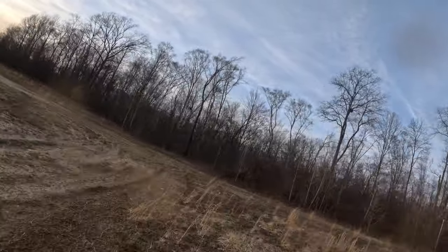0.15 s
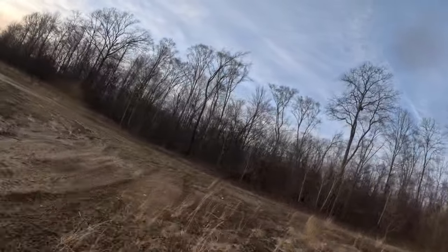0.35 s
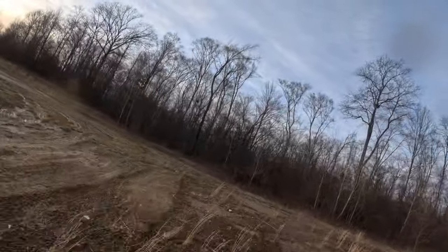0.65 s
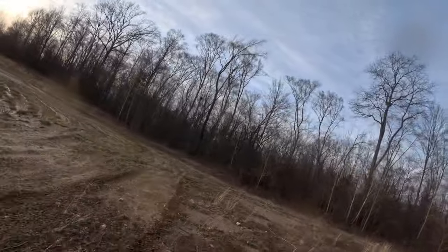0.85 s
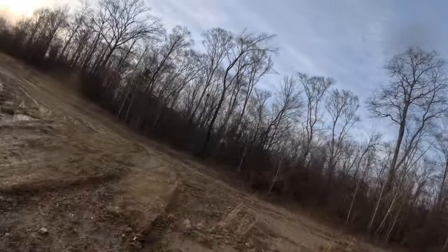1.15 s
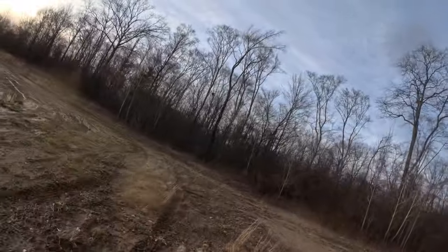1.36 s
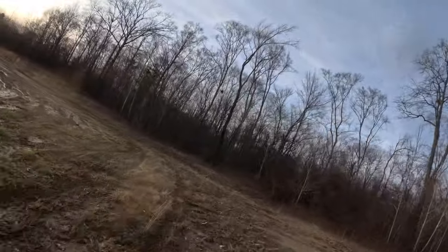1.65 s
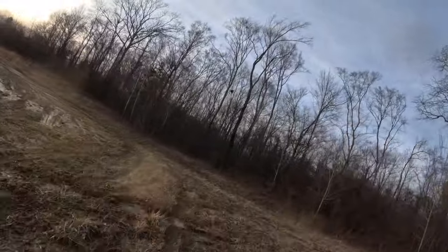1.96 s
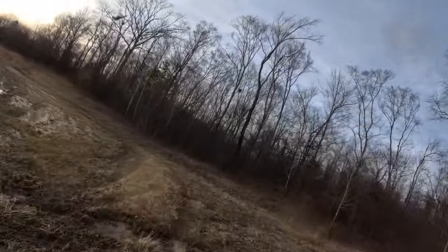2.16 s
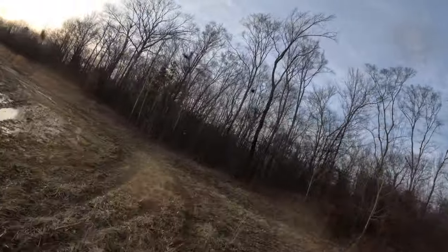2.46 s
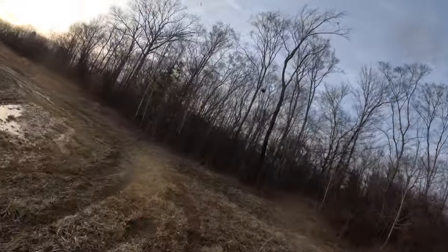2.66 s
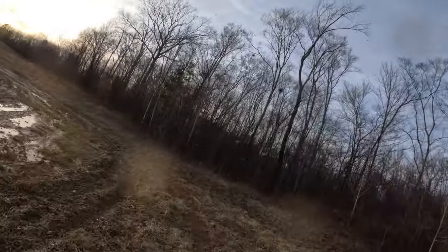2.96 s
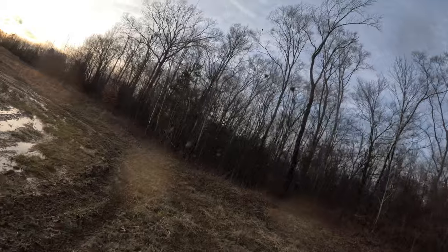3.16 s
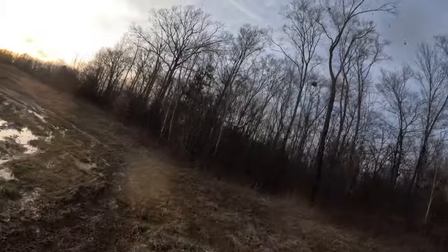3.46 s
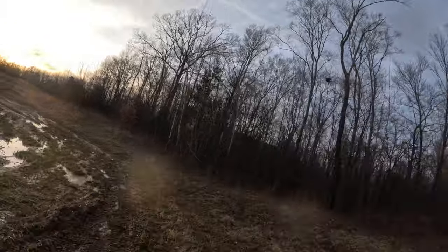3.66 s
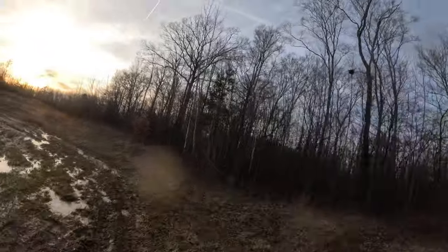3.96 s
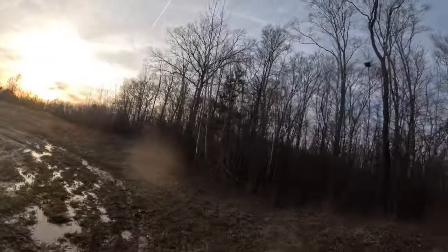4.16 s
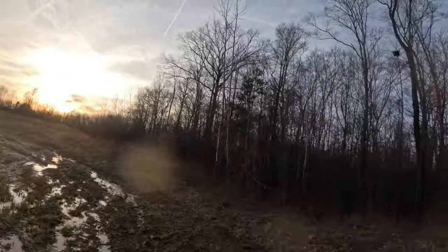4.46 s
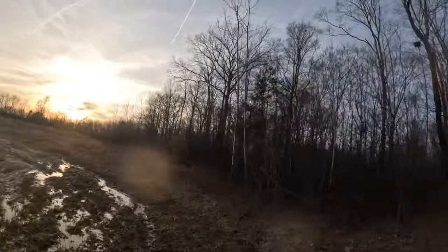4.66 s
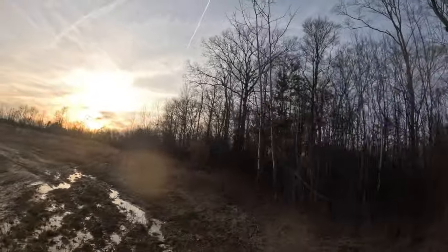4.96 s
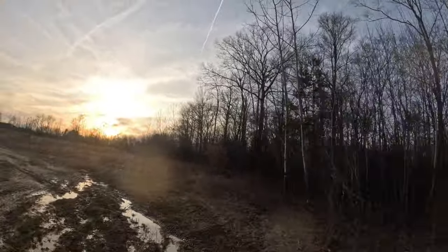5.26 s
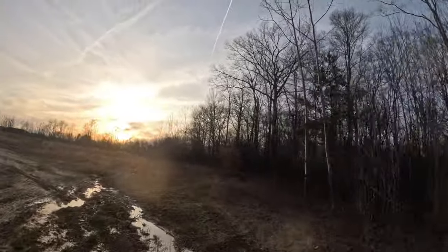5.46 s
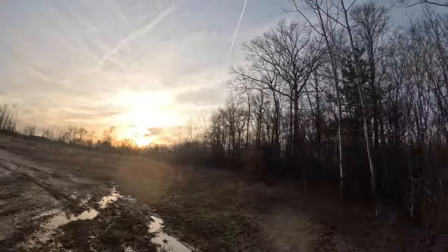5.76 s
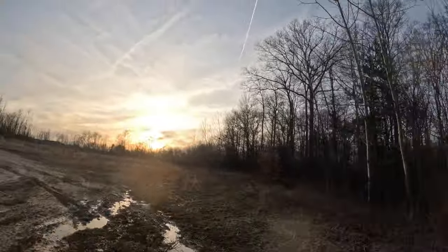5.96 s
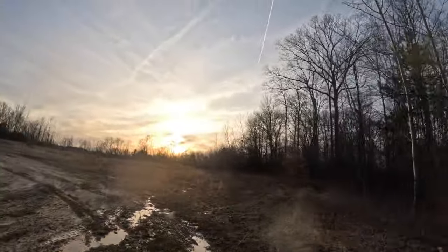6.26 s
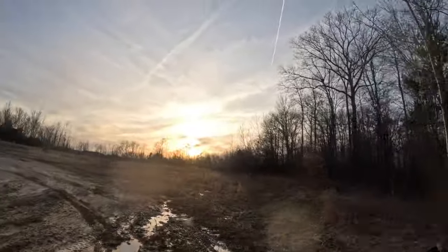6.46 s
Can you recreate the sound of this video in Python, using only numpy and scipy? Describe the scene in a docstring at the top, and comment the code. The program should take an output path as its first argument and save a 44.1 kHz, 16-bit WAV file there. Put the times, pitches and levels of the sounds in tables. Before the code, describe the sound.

An off-road vehicle's exhaust drones steadily close to the microphone, harsh at first and then lower and smoother as it loses speed on muddy open ground. Under it are rumbling tyres and gusts of wind thumping the microphone. Showers of wet dirt, soft clods and sharp little stones hit the bodywork at irregular moments. Near the end the engine briefly coasts, then picks up again.

```python
"""Off-roader in a muddy field

Heard from on board, the exhaust drones as the revs sink and recover. At first the engine rasps
and wind buffets the microphone; both ease as the ride slows. The tyres roar and fling wet dirt
at the body, and stones click on the panels. A limiter holds the loudest peaks down."""
import sys
import numpy as np
from scipy import signal
from scipy.fft import rfft, irfft, next_fast_len
from scipy.io import wavfile
from scipy.ndimage import uniform_filter1d, minimum_filter1d, map_coordinates

SR = 44100
rng = np.random.default_rng(int(sys.argv[2]) if len(sys.argv) > 2 else 0)


def output_pcm(signal):
    """Save a mono or channel-first signal as 16-bit PCM at the path in sys.argv[1].

    Samples are clipped to [-1, 1] before scaling.
    """
    pcm = np.clip(np.atleast_2d(signal).T, -1, 1) * 32767
    wavfile.write(sys.argv[1], SR, np.round(pcm).astype(np.int16))


N = 291942


def amp(db):
    """Turn decibels (dB) into a number to multiply a sound by."""
    return 10 ** (np.asarray(db) / 20)


def unit(x):
    """Scale a sound so that its average power is 1."""
    return x / np.sqrt(np.mean(x ** 2) + 1e-20)


def curves(rows):
    """Join rows that begin with a time by straight lines: one curve for each further column."""
    times, *columns = np.transpose(rows)
    return [np.interp(np.arange(N) / SR, times, column) for column in columns]


def wobble(rate):
    """A smooth random curve that passes through `rate` new values a second."""
    values = rng.standard_normal(int(N * rate / SR) + 4)
    return map_coordinates(values, [np.arange(N) * rate / SR])


def bumps(rows):
    """A curve in dB made of rounded humps and dips."""
    t = np.arange(N) / SR
    return sum(db * np.exp(-(2 * (t - middle) / length) ** 2) for middle, length, db in rows)


def swells(rows, attack_s, release_s):
    """A volume curve of events that rise, hold and die away."""
    t = np.arange(N) / SR
    return sum(amp(db) * np.clip((t - start) / attack_s, 0, 1)
               * np.exp(-np.maximum(t - start - length, 0) / release_s) for start, length, db in rows)


def filtered(x, response):
    """Multiply each frequency in a sound by response(frequency)."""
    size = next_fast_len(N + SR // 2)
    return irfft(rfft(x, size) * response(np.fft.rfftfreq(size, 1 / SR)), size)[:N]


def coloured(x, points):
    """Shape the bass and treble along a line through (Hz, dB) points."""
    point_hz, db = np.transpose(points)
    return filtered(x, lambda hz: amp(np.interp(np.log(hz + 1), np.log(point_hz), db)))


def resonate(x, modes):
    """Pass a sound through resonances, the pitches at which an object likes to ring."""
    return filtered(x, lambda hz: sum(
        (-1) ** k * amp(db) * 1j * hz * width / (centre ** 2 - hz ** 2 + 1j * hz * width)
        for k, (centre, width, db) in enumerate(modes)))


def patchy(x, depth_db):
    """Make a sound louder and softer in random patches of time and pitch."""
    spectra = signal.stft(x, nperseg=512)[2]
    patches = uniform_filter1d(rng.standard_normal(spectra.shape), size=6, axis=0)
    patches = uniform_filter1d(patches, size=8, axis=1)
    return unit(signal.istft(spectra * amp(depth_db * unit(patches)), nperseg=512)[1][:N])


def grains(rate, spread_db):
    """Tiny random hits of uneven size, about `rate` a second."""
    hits = rng.random(N) < rate / SR
    signs = rng.choice([-1, 1], N)
    return unit(hits * signs * amp(spread_db * np.minimum(rng.exponential(size=N), 4)))


def knock(hz, width, fade_s, attack_s):
    """A burst of noise around one pitch (width is a share of it), falling 60 dB in fade_s."""
    t = np.arange(SR // 3) / SR
    band = signal.butter(2, [hz / (1 + width), hz * (1 + width)], "bandpass", fs=SR)
    noise = unit(signal.lfilter(*band, rng.standard_normal(len(t))))
    return noise * amp(-60 * t / fade_s) * (1 - np.exp(-t / attack_s))


def by_speed(full_db, doubling_db):
    """A level that is full_db at top speed and loses doubling_db each time the speed halves."""
    # Each row: time in seconds, ground speed as a share of the top speed.
    speeds = [(0, 0.85), (.2, 1), (.6, 0.73), (1.6, 0.64), (2.7, 0.55), (3.8, 0.45), (4.3, 0.43),
              (5.3, 0.42), (6.62, 0.35)]
    speed, = curves(speeds)
    return full_db + doubling_db * np.log2(np.maximum(speed, 1e-2))


def sizzle(start_s=3.2, rise_s=1.3):
    """A faint, very high hiss grows in the second half."""
    rise = np.clip((np.arange(N) / SR - start_s) / rise_s, 0, 1)
    level = rise * amp(-45 + 1.5 * wobble(30))
    tone = [(10500, -55.5), (11800, 2), (12600, 4), (13600, -13), (16000, -19.5)]
    return level * unit(coloured(rng.standard_normal(N), tone))


def wind_strength():
    """The wind's level in dB: the air rushing past, plus gusts and lulls."""
    # Each row: middle in seconds, length in seconds, change in dB.
    gusts = [(0.272, 0.099, 3), (2.119, 0.16, 8), (2.85, .35, -3), (3.34, 0.085, 3.5), (3.54, 0.074, 3.5),
             (4.35, 0.37, -8.5), (4.573, 0.091, 3.5), (4.884, 0.11, 2), (5.2, .14, 5), (5.67, 0.15, -3.5),
             (6.25, .45, -7)]
    return by_speed(full_db=-17.5, doubling_db=7.9) + bumps(gusts)


def wind(wind_db):
    """Swirls of air thump on the microphone's opening."""
    # The deep tone of the wind. Each row: frequency in Hz, relative level in dB.
    tone = [(10, -11.5), (25, -4), (50, -0.5), (80, 2), (130, -3), (200, -9.5), (320, -22), (800, -54.5)]
    return amp(wind_db) * unit(amp(1.2 * wobble(18)) * coloured(rng.standard_normal(N), tone))


def tyres():
    """Knobbly tyres roar over soft, uneven ground and set the vehicle's frame drumming."""
    # The tone of the roar. Each row: frequency in Hz, relative level in dB.
    roar_tone = [(60, -11), (150, -0.5), (300, 1), (420, -1.5), (600, -5), (800, -4), (1030, -5.5),
                 (1250, -6.5), (1450, -7.5), (1900, -14.5), (3000, -21.5), (5000, -28), (7000, -35)]
    # Where the frame rings. Each row: pitch in Hz, width in Hz, relative level in dB.
    frame_modes = [(217, 150, -3.5), (354, 86, 0), (524, 170, -2)]
    tread = patchy(rng.standard_normal(N) + 0.5 * grains(rate=700, spread_db=4.5), depth_db=0.5)
    roar_db = by_speed(full_db=-26, doubling_db=6.4) + 0.9 * wobble(18)
    roar = amp(roar_db) * unit(coloured(tread, roar_tone))
    jolts = patchy(rng.standard_normal(N), depth_db=1.5)
    drumming = coloured(resonate(jolts, frame_modes), [(120, -9.5), (200, 1.5), (650, 1.5), (1200, -14)])
    return roar + amp(by_speed(full_db=-28, doubling_db=9.8)) * unit(drumming)


def spray():
    """Wet grit patters on the body all the time, and in showers where the tyres dig in."""
    # Showers of dirt. Each row: start in seconds, length in seconds, level in dB.
    flings = [(.12, .07, -37), (.745, .06, -39), (1.01, 0.06, -40), (1.16, 0.042, -39.5),
              (1.64, 0.068, -37.5), (2.02, .16, -40), (2.345, 0.061, -36.5), (2.505, 0.087, -35),
              (2.7, .07, -35.5), (2.86, 0.037, -40), (3.02, 0.078, -42), (3.26, 0.15, -39.5),
              (3.89, 0.092, -38), (4.86, .08, -43.5), (5.11, .21, -41)]
    # The tone of the grit. Each row: frequency in Hz, relative level in dB.
    tone = [(300, -16.5), (800, -1.5), (1500, 3), (2200, 0.5), (3000, 1), (4000, -2.5), (5000, -8),
            (6500, -13), (7500, -16)]
    steady = amp(by_speed(full_db=-40, doubling_db=2.1))
    showers = swells(flings, attack_s=0.0077, release_s=0.023)
    grit = patchy(rng.standard_normal(N) + 0.7 * grains(rate=1600, spread_db=2), depth_db=1)
    hard_grains = grains(rate=57, spread_db=2.5)
    ticks = signal.fftconvolve(hard_grains, knock(7000, width=0.92, fade_s=0.008, attack_s=0.0003))[:N]
    patter = amp(0.5 * wobble(11) + 0.98 * wobble(50)) * unit(coloured(grit, tone))
    return np.hypot(steady, showers) * (patter + amp(-21.5) * unit(ticks))


def clods():
    """Soft lumps of mud slap the underside of the floor."""
    # Each row: start in seconds, level in dB, pitch in Hz, seconds to fade by 60 dB.
    lumps = [(.446, -24, 580, 0.058), (1.432, -25.5, 557, 0.15), (1.688, -21, 594, 0.2),
             (2.048, -31, 1970, 0.28), (2.12, -31, 646, 0.2), (2.405, -22, 834, 0.06),
             (2.512, -31, 1583, 0.19), (2.549, -29.5, 2396, 0.17), (2.6, -25, 587, .15),
             (2.712, -32, 2400, .11), (2.82, -25.5, 600.3, 0.26), (3.041, -33, 1616, 0.22),
             (3.254, -27, 1295, 0.21), (3.389, -29, 1112, .2), (3.783, -25, 1109, 0.094),
             (4.39, -30, 599.5, 0.27), (4.57, -28.5, 1480, 0.11), (4.9, -29, 1285, .11),
             (5.255, -30, 1307, .14)]
    out = np.zeros(N + SR)
    for start, db, hz, fade_s in lumps:
        slap = amp(db) * knock(hz, width=0.33, fade_s=fade_s, attack_s=0.004)
        out[round(start * SR):][:len(slap)] += slap
    return out[:N]


def stones():
    """Each stone gives a bright crack and makes a plastic panel ring briefly."""
    # Each row: start in seconds, ring level in dB, ring pitch in Hz, crack level in dB.
    hits = [(.765, -34, 4240, -44), (0.945, -40, 3220, -35), (1.315, -30.5, 4600, -51),
            (1.34, -25, 2580, -24.5), (1.425, -36, 3189, -32.5), (2.019, -23, 2660, -32.5),
            (2.35, -39, 4180, -34), (3.988, -31, 2990, -37), (4.951, -30, 3060, -46),
            (5.039, -29.5, 2940, -36), (5.261, -31, 2698, -43)]
    out = np.zeros(N + SR)
    for start, ring_db, hz, crack_db in hits:
        ring = amp(ring_db) * knock(hz, width=0.12, fade_s=0.061, attack_s=0.0025)
        crack = amp(crack_db) * knock(7100, width=0.89, fade_s=0.029, attack_s=0.002)
        out[round(start * SR):][:len(ring)] += ring + crack
    return out[:N]


def singing_part():
    """Something on the vehicle is shaken into a faint, hoarse note that swells once."""
    # Each row: start in seconds, length in seconds, level in dB.
    swell = [(1.92, .35, -36)]
    level = amp(-56) + swells(swell, attack_s=0.17, release_s=0.044)
    note = [(1000, 150, 0)]  # pitch in Hz, width in Hz, dB
    return level * unit(resonate(resonate(rng.standard_normal(N), note), note))


def belt(phase):
    """The drive belt's teeth make a fuzzy whine whose pitch follows the revs."""
    # Each row: time in seconds, level in dB.
    levels = [(0, -42), (2.4, -54.5), (4, -52.5), (6, -53), (6.3, -47), (6.62, -43.5)]
    belt_db, = curves(levels)
    tooth_phase = 11.35 * phase + 1.1 * wobble(70)
    whine = np.cos(tooth_phase) + amp(-9.5) * np.cos(3 * tooth_phase)
    return amp(belt_db + 6.1 * wobble(40)) * whine


def rasp(phase):
    """Rushing gas and clattering valves pulse with each firing and make the engine bay ring."""
    # The rasp is loud at first, fades within two seconds, then stays faint.
    # Each row: time in seconds, level in dB.
    levels = [(0, -25.5), (.2, -26.5), (.6, -31.5), (1.2, -33.5), (1.6, -43), (3, -48), (5.8, -43.5),
              (6.3, -58)]
    # Where the bay rings. Each row: pitch in Hz, width in Hz, relative level in dB.
    bay_modes = [(567, 150, -4.5), (1024, 100, 1), (1174, 89, -5), (1480, 150, -2.5), (2127, 200, -2.5),
                 (2540, 250, -8.5), (3200, 240, -6.5)]
    rasp_db, = curves(levels)
    pulsing = 1 + 0.13 * np.cos(phase) + 0.04 * np.cos(phase / 2)
    puffs = pulsing * (rng.standard_normal(N) + 0.65 * grains(rate=770, spread_db=-0.5))
    tone = [(200, -3.5), (500, 5), (3400, 0.5), (4200, -5), (7000, -10), (10000, -13)]
    return amp(rasp_db) * unit(coloured(resonate(puffs, bay_modes), tone))


def cab_boom(hz, centre_hz, width_hz, peak_db):
    """A tone booms near a pitch at which the cab rings. Gives its level in dB and lag in radians."""
    off_peak = 2 * (hz - centre_hz) / width_hz
    return peak_db - 10 * np.log10(1 + off_peak ** 2), np.pi / 2 + np.arctan(off_peak)


def exhaust(phase, firing_hz, wind_db):
    """A drone with faint side tones that follow the revs; strong wind makes it flutter."""
    # The main tone, at the firing rate. Each row: time in seconds, level in dB.
    levels = [(0, -16), (0.6, -19), (1.6, -16.1), (2.12, -19.5), (2.35, -16.9), (2.95, -13.5), (3.7, -14.5),
              (4.4, -13.5), (5.05, -15), (5.4, -14.5), (5.65, -11.5), (6.08, -12.5), (6.25, -13),
              (6.62, -15)]
    # Each row: time in seconds, throttle from 0 (shut) to 1 (wide open).
    openings = [(0, 1), (3.6, 0.9), (4.5, 0.83), (5.46, 0.44), (5.68, 0), (6.09, 0), (6.24, 0.7),
                (6.62, .64)]
    # The second tone sags or swells. Each row: middle in seconds, length in seconds, change in dB.
    swings = [(1.55, 0.21, -11.5), (1.9, .3, 2.5), (2.28, 0.16, -6), (2.5, .2, 3), (2.82, 0.31, 5.5),
              (3.5, .4, -4.5)]
    # Each row: pitch ratio to the main tone, then dB against it with the throttle shut and open.
    side_tones = [(.5, -31.5, -19.5), (1.5, -26.5, -34), (2.5, -29.5, -37.5), (2.75, -32, -44),
                  (3.75, -42, -26), (4, -41.5, -26.5), (4.25, -42, -32.5), (5, -30.5, -39.5),
                  (5.75, -45, -37), (6, -34, -37.5), (6.75, -42.5, -35.5), (8, -40, -36.5),
                  (9.25, -38.5, -41.5), (10.5, -42.5, -36.5)]
    main_db, = curves(levels)
    throttle, = curves(openings)
    second_db, second_lag = cab_boom(2 * firing_hz, centre_hz=188.6, width_hz=24, peak_db=-26)
    third_db, third_lag = cab_boom(3 * firing_hz, centre_hz=282.7, width_hz=65, peak_db=-37)
    coasting = np.clip(1 - throttle / 0.49, 0, 1)  # grows as the throttle closes past about half
    second_db += bumps(swings) - 14 * coasting
    flutter = amp(0.65 * (wind_db - wind_db.max()))
    drone = amp(main_db + 1.8 * flutter * wobble(30)) * np.cos(phase)
    second_level = amp(second_db + 4.2 * flutter * wobble(25))
    drone += second_level * np.cos(2 * phase - second_lag + 0.29 * flutter * wobble(25))
    third_level = amp(third_db + 1.9 * flutter * wobble(25))
    drone += third_level * np.cos(3 * phase - third_lag + 0.13 * flutter * wobble(25))
    for ratio, shut_db, open_db in side_tones:
        # the side tones come and go at random
        db = main_db + shut_db + throttle * (open_db - shut_db) + 2 * wobble(4) + wobble(25)
        jitter = (0.15 + 0.43 * flutter) * wobble(30)
        drone += amp(db) * np.cos(ratio * phase + jitter + rng.uniform(0, 2 * np.pi))
    return np.sqrt(2) * drone


def scene():
    """Add up engine, ground and air sounds; they all ride along with the microphone."""
    # The revs. Each row: time in seconds, engine firings per second.
    revs = [(0, 118.9), (.85, 109.5), (1.25, 100.6), (1.6, 97.44), (2.1, 93.13), (2.7, 98.8), (2.88, 105.3),
            (3.1, 108.2), (4.05, 97.9), (4.5, 101.6), (5.1, 94.3), (5.27, 95), (5.55, 90.24), (5.85, 90),
            (6.02, 87.6), (6.25, 97.8), (6.45, 98.46), (6.62, 93)]
    firing_hz, = curves(revs)
    wind_db = wind_strength()
    phase = 2 * np.pi * np.cumsum(firing_hz * (1 + 0.002 * wobble(20))) / SR  # one circle per firing
    engine = exhaust(phase, firing_hz, wind_db) + rasp(phase) + belt(phase) + singing_part()
    ground = tyres() + spray() + stones() + clods()
    return (engine + ground + wind(wind_db) + sizzle())[None]


def limit(x, ceiling, window_samples):
    """Turn the volume down just ahead of each peak that would pass the ceiling."""
    gain = np.minimum(1, ceiling / (np.abs(x) + 1e-9))
    return x * uniform_filter1d(minimum_filter1d(gain, window_samples), window_samples)


def record(dry):
    """The microphone dulls the treble, a limiter holds the peaks, and the very top is cut off."""
    # The microphone's treble. Each row: frequency in Hz, change in dB.
    treble = [(6800, -0.5), (7250, -7.5), (7700, -18.5), (8500, -20), (10000, -17.5), (11000, -23),
              (12300, -26), (14000, -29.5)]
    held = limit(coloured(dry[0], treble), ceiling=0.4, window_samples=700)
    return filtered(held, lambda hz: hz < 15700)[None]


dry = scene()
out = record(dry)
output_pcm(out)
```